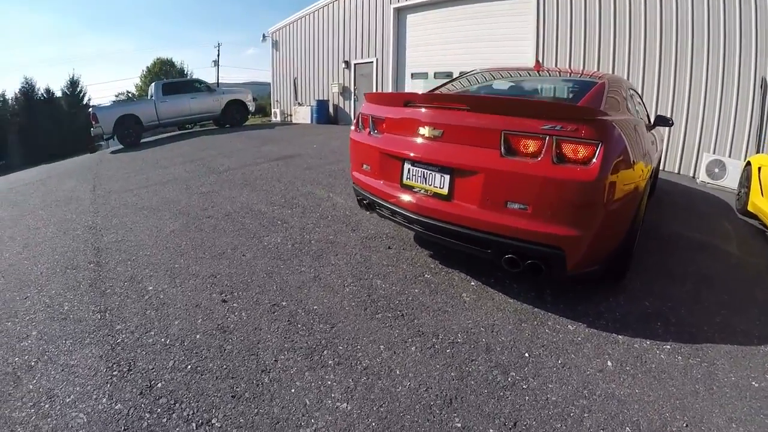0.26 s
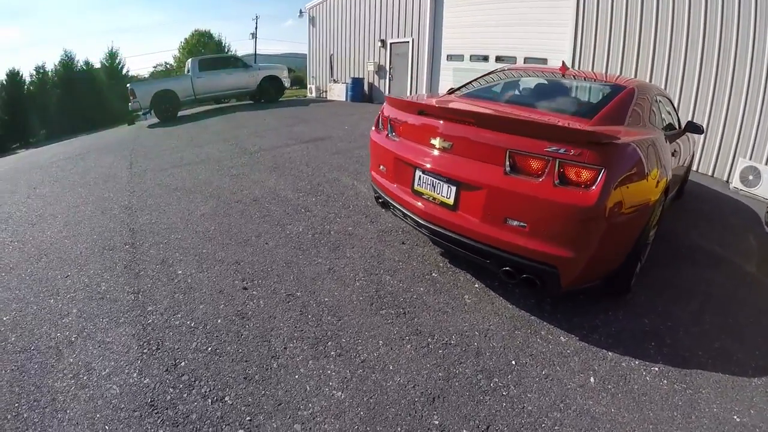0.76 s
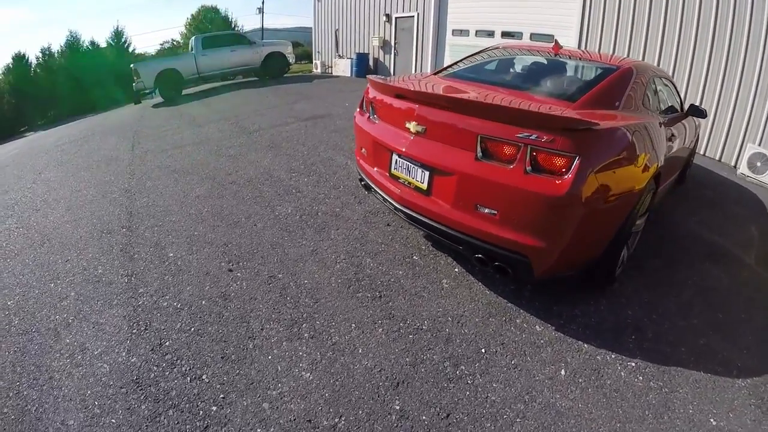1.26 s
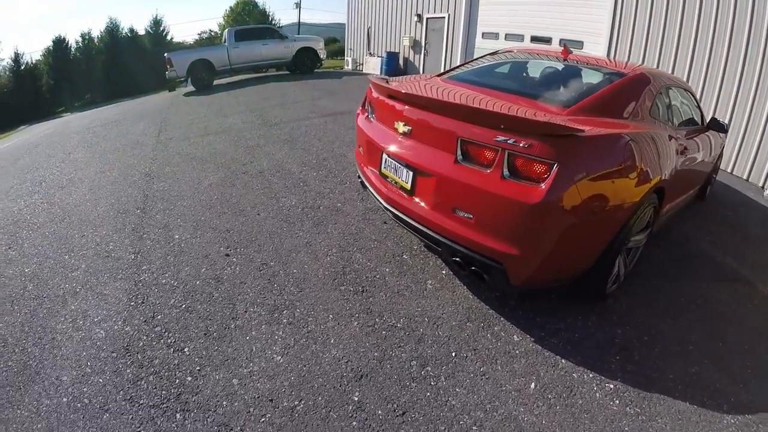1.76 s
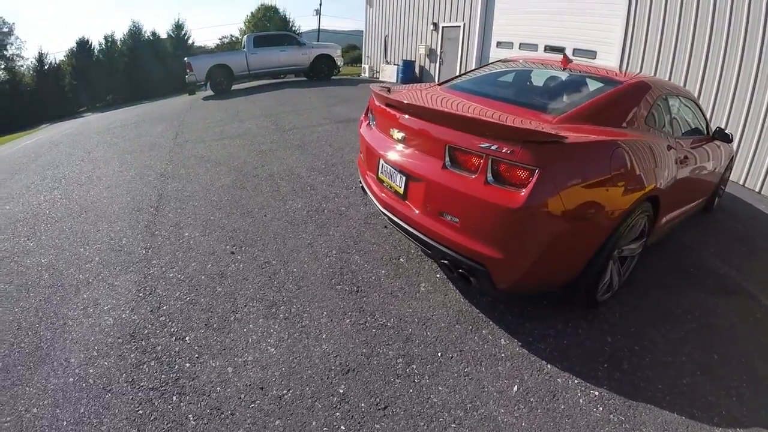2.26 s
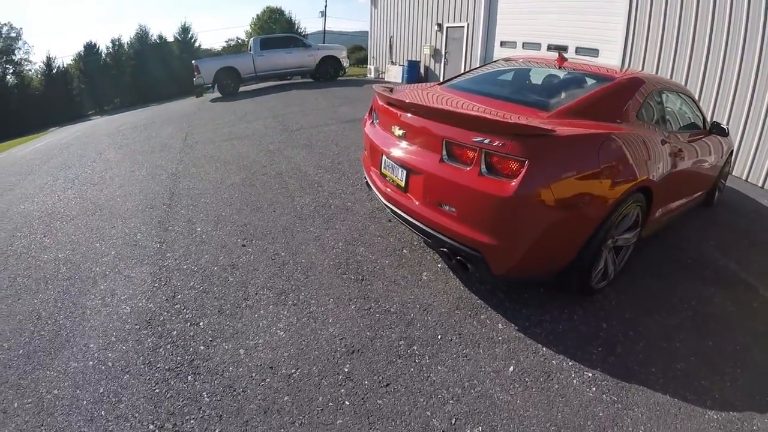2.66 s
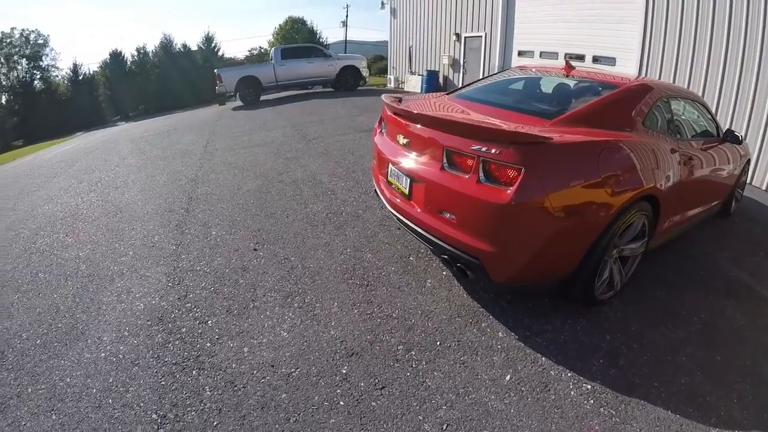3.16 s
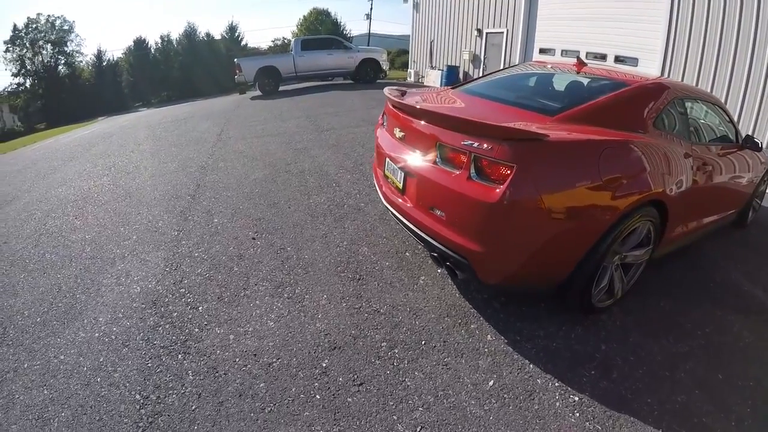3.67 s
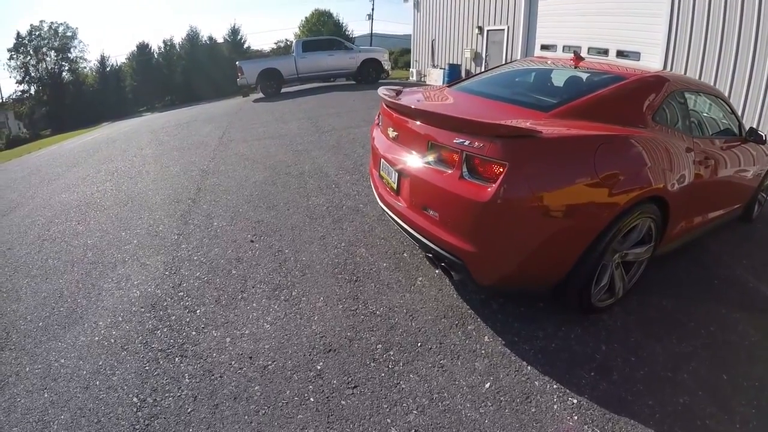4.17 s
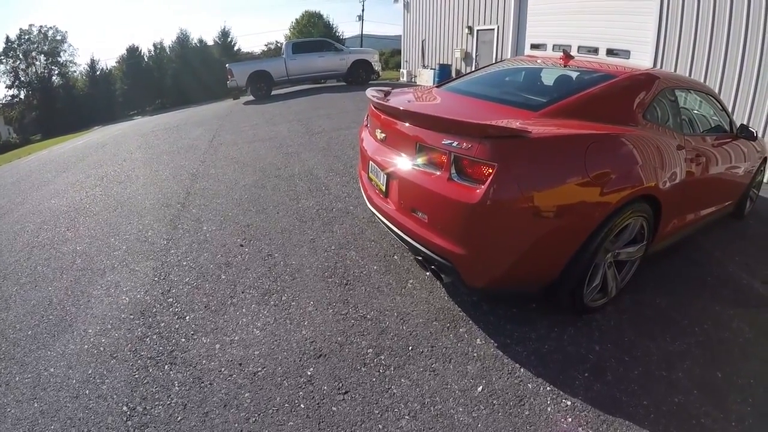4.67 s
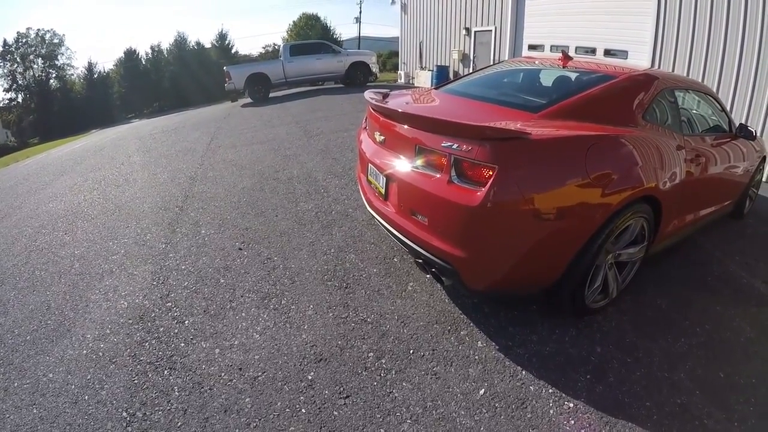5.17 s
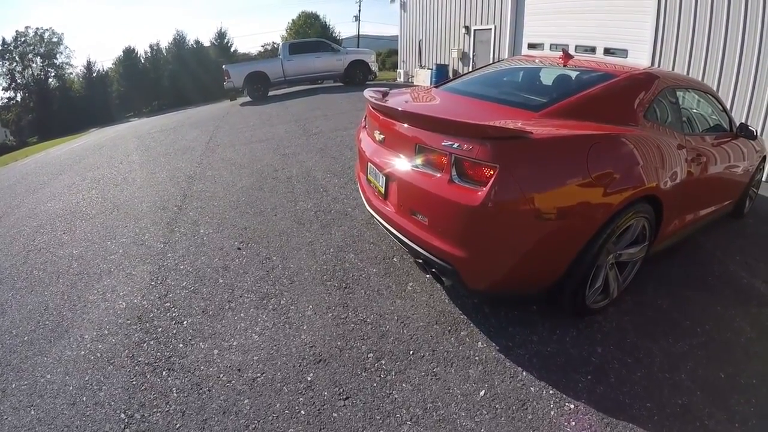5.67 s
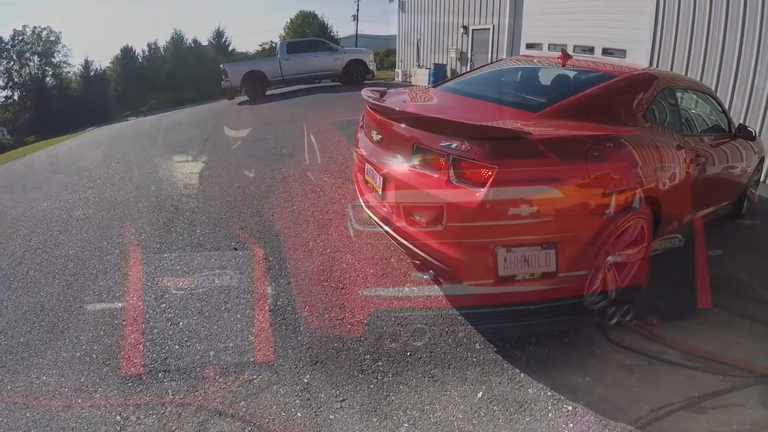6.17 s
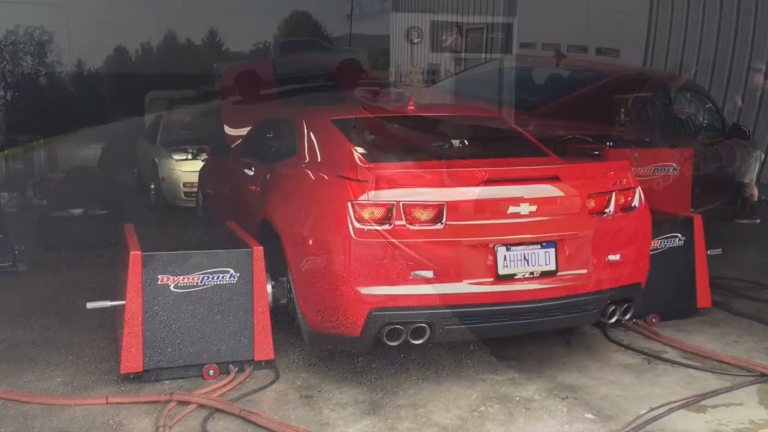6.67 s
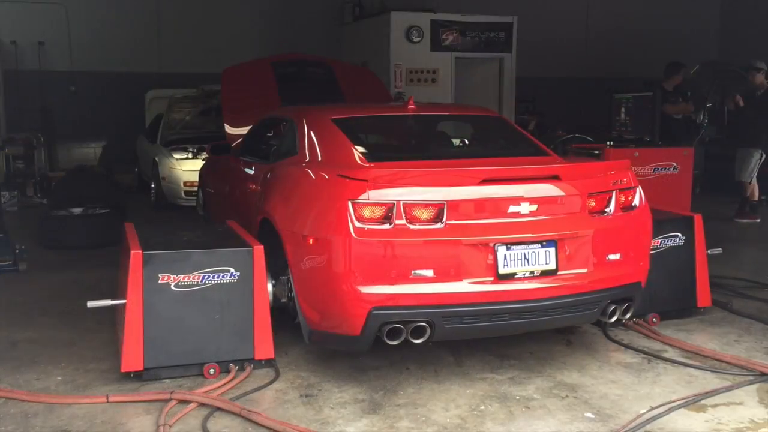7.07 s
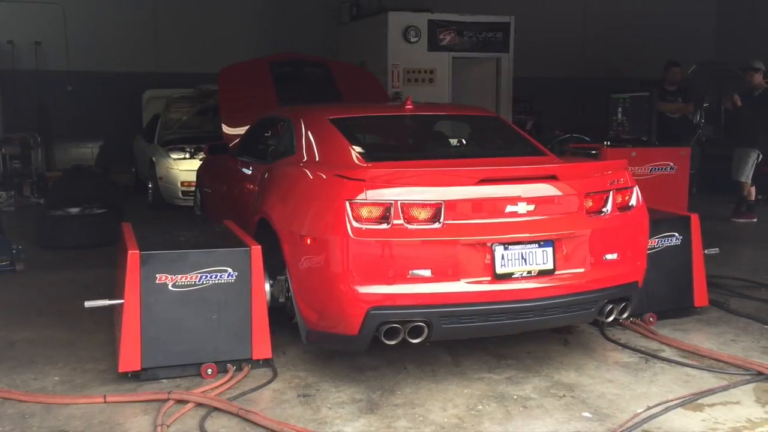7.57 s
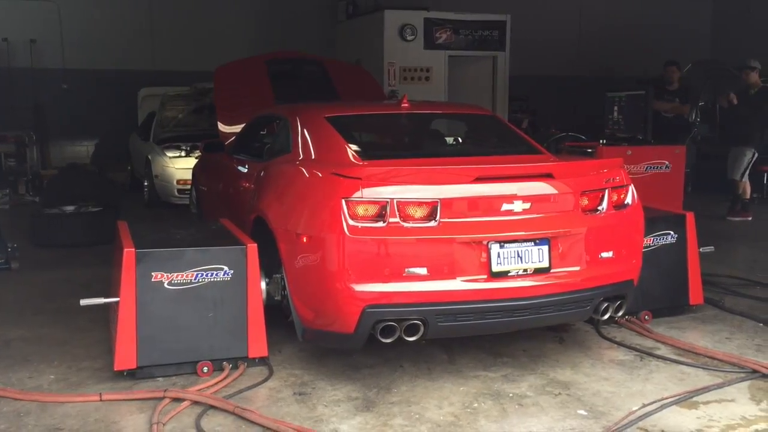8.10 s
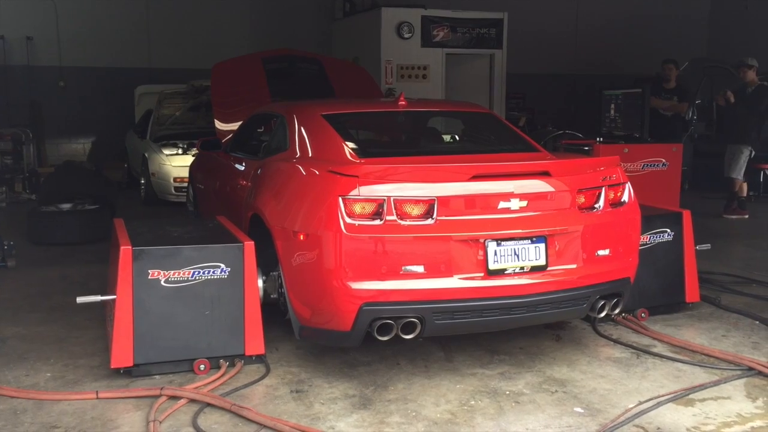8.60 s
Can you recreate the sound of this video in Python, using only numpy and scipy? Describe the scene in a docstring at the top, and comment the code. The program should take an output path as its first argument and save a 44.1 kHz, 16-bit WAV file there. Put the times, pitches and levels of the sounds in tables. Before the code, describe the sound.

Heard from close behind dual exhausts outdoors, a V8 falls quickly from a blip with hollow hoots, thumps and sharp pops, then catches and settles into a deep, uneven, booming idle with growing rasp and hiss. Around six seconds it dissolves into a full-throttle pull in a workshop, a resonant drone and gas roar rising in pitch and strength until the revs just begin to drop.

```python
"""A V8 with an open dual exhaust, heard from close behind: it drops from a blip with pops and hoots, then settles into a
booming, raspy idle. This fades into the same engine at full throttle on a dynamometer in a workshop, climbing in
speed until the revs begin to fall. Tones locked to the engine cycle make boom and drone; puffs of gas, as filtered
noise, make burble, bark, rasp, hiss and roar."""
import sys
import numpy as np
from scipy import signal
from scipy.fft import rfft, irfft, next_fast_len
from scipy.io import wavfile
from scipy.ndimage import uniform_filter1d, map_coordinates

SR = 44100
rng = np.random.default_rng(int(sys.argv[2]) if len(sys.argv) > 2 else 0)


def unload_wav(signal):
    """Save mono or channel-first audio to the path in sys.argv[1] as 16-bit WAV at rate SR, clipped to [-1, 1]."""
    wavfile.write(
        sys.argv[1],
        SR,
        np.round(np.clip(np.atleast_2d(signal).T, -1, 1) * 32767).astype(np.int16),
    )


N = 389844

# puff strength of each cylinder in firing order, before contrast: relative_db
CYLINDER_PUFFS = [-3.5, -0.5, -2, -3, 0, -2, -1.5, -0.57]
# ringing of the steel pipes: centre_hz, width_hz, relative_db
STEEL_MODES = [(1180, 146, -4.5), (1362, 50, 3.5), (1633, 122, 0), (1985, 70, -3.5), (2182, 90, -1),
               (2399, 94, 1.5), (2635, 124, -3), (3010, 167, 1.5), (3445, 135, 1), (3845, 150, -7),
               (4486, 200, -4)]
# colour of the jet's hiss: freq_hz, relative_db
HISS_COLOUR = [(3600, -41), (4800, 1), (5500, -1), (6100, -1), (7000, -4.5), (7450, -2.5), (7900, -6.5),
               (9500, -5), (11000, -10.5), (13000, -17), (15100, -24), (15600, -62)]
# a slow jet leaves the pipes' middle resonances weaker: freq_hz, relative_db
SLOW_JET_COLOUR = [(1650, 0.5), (1800, -5), (1950, 2), (2150, -6.5), (2420, -4.5), (2650, 2.5),
                   (3100, -2.5), (3550, 0.5), (4500, 1.5), (4950, 7), (5600, 1)]
# hollow ring of the tailpipes: freq_hz, relative_db
HOLLOW_COLOUR = [(50, -17), (115, 15), (160, 13.5), (220, -9), (255, -13), (276, 2.5), (300, -23),
                 (400, -10), (490, -2.5), (580, -19), (1000, -23), (1800, -27), (3000, -52), (8000, -68)]


def idle():
    """The pipe booms at the firing rate; each puff burbles, barks, rasps and hisses on its way out."""
    # gas jet strength against the settled idle: time_s, level_db
    jet_strength = [(0, -15.5), (.3, -22), (.95, -22), (1.25, -16.5), (1.55, -9.5), (2.1, -8.5), (2.6, -5),
                    (3.3, 0)]
    # idle speed beneath the blip, hunting a little: time_s, firings_per_s
    idle_speed = [(1.4, 47.54), (2, 50.92), (2.5, 49.39), (3.1, 50.16), (4.1, 51.35), (4.7, 51.61),
                  (5.2, 50.96), (5.5, 51.52), (6.2, 50.16)]
    blip_hz, run_down_s, first_firing = 69, 0.851, 1.17
    t = np.arange(N) / SR
    jet_db, = curves(jet_strength)
    # the fuel comes back and the engine catches
    caught = ramp(start_s=0.61, length_s=0.62)
    # the blip's surplus of firings dies away exponentially
    rate = curves(idle_speed)[0] + blip_hz * np.exp(-t / run_down_s)
    firings = first_firing + np.cumsum(rate) / SR
    cycles = firings / len(CYLINDER_PUFFS)
    outflow = firings - 0.17
    flow = puffs(outflow, rise_s=0.0037, decay_s=0.0049, contrast=0.46, steady=0.96)
    low = boom(rate, cycles, jet_db, caught) + lope(firings, rate, jet_db) + stumble(cycles) + thuds()
    puffing = burble(flow, cycles, jet_db) + bark(outflow, cycles)
    # the strongest puffs tear into a jet
    spit = spits()
    jetting = rasp(outflow, cycles, spit, jet_db) + hiss(outflow, spit, jet_db, caught)
    return low + thrum(flow) + puffing + jetting


def boom(rate, cycles, jet_db, caught):
    """Firing rate and overtones, loudest where the firing rate meets the pipe resonance."""
    # boom partials: multiple_of_cycle_rate, relative_db
    partials = [(8, 0.5), (16, -17.5), (32, -27)]
    # pipe resonance: firing_rate_hz, gain_db
    resonance = [(51, -0.5), (54, -0.5), (59, 0.8), (66, -0.5), (77, -1), (110, -15)]
    overrun_db, caught_db, overtone_db_per_jet_db = -25, -12.5, 0.99
    tone = np.zeros(N)
    for k, db in partials:
        growth_db = overtone_db_per_jet_db * jet_db * (k > len(CYLINDER_PUFFS))
        tone += amp(db + growth_db + 0.15 * wobble(13)) * np.cos(2 * np.pi * k * cycles)
    level_db = overrun_db + (caught_db - overrun_db) * caught
    return amp(level_db) * along(resonance, rate) * unit(tone)


def lope(firings, rate, jet_db):
    """Each bank fires unevenly, so the pipes' low resonances throb in turn, once every engine cycle."""
    # throbs: place_in_cycle_firings, length_firings, resonance_hz, level_db
    throbs = [(7.15, 3.1, 74, -17), (0.45, 1.6, 110, -37), (7.47, 1.27, 210, -29.5),
              (0.468, 1.43, 267, -29), (4.7, 2.03, 270, -32), (3.67, 2.5, 142, -30.5)]
    count = len(CYLINDER_PUFFS)
    total = np.zeros(N)
    for place, length, hz, db in throbs:
        offset = (firings - place + count / 2) % count - count / 2
        envelope = amp(db + 0.83 * wobble(6.6)) * swell(offset, length)
        total += envelope * np.cos(2 * np.pi * hz * offset / rate + 0.2 * wobble(12))
    return amp(jet_db) * total


def stumble(cycles):
    """Around the catch a lower order swells and beats against the boom."""
    order, middle_s, length_s, level_db = 6, 0.67, 0.72, -23.5
    t = np.arange(N) / SR
    return amp(level_db) * swell(t - middle_s, length_s) * np.cos(2 * np.pi * order * cycles)


def thuds():
    """Uneven low thudding: steady noise in a low band."""
    # thud colour: freq_hz, relative_db
    thud_colour = [(12, -19), (30, -11), (52, -2), (69, -2.5), (100, -12.5), (160, -36), (300, -77)]
    return amp(-32) * coloured(rng.standard_normal(N), thud_colour)


def burble(flow, cycles, jet_db):
    """Puffs modulate a ripple that largely repeats every engine cycle, coloured by the tailpipe."""
    # burble colour: freq_hz, relative_db
    burble_colour = [(60, -28.5), (95, 2.5), (122, 0), (150, -1), (175, 0), (203, 3), (228, -7.5),
                     (265, -3.5), (300, -10), (335, -13), (385, -16), (600, -54.5)]
    settled_db, db_per_jet_db = -30.5, 0.36
    ripple = gas(cycles + 0.001 * wobble(8), repeat=0.92)
    return amp(settled_db + db_per_jet_db * jet_db) * coloured(flow * ripple, burble_colour)


def bark(outflow, cycles):
    """Longer puffs excite the middle tailpipe resonances; the level opens up as the idle settles."""
    # bark colour: freq_hz, relative_db
    bark_colour = [(300, -40.5), (400, -13.5), (440, 0.5), (470, 4), (500, -4.5), (530, 5), (570, -9),
                   (612, 4), (650, -2.5), (700, 2), (750, -2), (810, -4), (900, -15), (1100, -17.5),
                   (1800, -47.5)]
    # bark level: time_s, level_db
    bark_level = [(0, -43), (.3, -47.5), (.95, -44), (1.25, -41.5), (1.55, -34.5), (2.52, -34.5),
                  (2.7, -29.5), (6.2, -28.5)]
    lumps = puffs(outflow, rise_s=0.002, decay_s=0.0096, contrast=0.55, steady=0.75)
    ripple = gas(cycles + 0.0012 * wobble(8), repeat=0.41)
    return amp(curves(bark_level)[0]) * coloured(lumps * ripple, bark_colour)


def spits():
    """Gain of the hard puffs that spit out of the idle."""
    # spits: time_s (4 ms before the middle), extra_db
    spit_times = [(2.134, 3), (2.728, 1), (3.312, 0), (3.651, 1.5), (3.929, 2.5), (3.967, 4), (4.24, 0.5),
                  (4.639, 1), (4.699, 0.5), (5.789, 0.5), (5.887, 0.5), (5.947, 2), (6.263, 2.5)]
    t = np.arange(N) / SR
    return amp(sum(db * swell(t - s - 0.004, 0.032) for s, db in spit_times))


def rasp(outflow, cycles, spit, jet_db):
    """The pulsing jet rings the steel; a slow jet leaves the middle modes weaker."""
    settled_db, db_per_jet_db = -32, 1
    jet = puffs(outflow, rise_s=0.0026, decay_s=0.0084, contrast=2.1, steady=0.33)
    jet *= amp(0.6 * wobble(18))
    ringing = steel(spit * jet * gas(cycles, repeat=0.3, size=8192), STEEL_MODES)
    full = churned(ringing, depth_db=4.5, size=512)
    slow = filtered(full, lambda hz: along(SLOW_JET_COLOUR, hz))
    fast = np.interp(jet_db, [-17, -9], [0, 1])
    return amp(settled_db + db_per_jet_db * jet_db) * (fast * full + (1 - fast) * slow)


def hiss(outflow, spit, jet_db, caught):
    """Jet turbulence at the tips: pulsed noise, duller in a slow jet and duller still on the overrun."""
    settled_db, db_per_jet_db = -36.5, 1.03
    # freq_hz, gain_db
    slow_colour = [(6000, -2.5), (8200, -0.5), (11000, -6.5), (15000, -3)]
    overrun_colour = [(5200, -2.5), (7000, -6.5)]
    spray = puffs(outflow, rise_s=0.003, decay_s=0.0062, contrast=3.2, steady=0.18)
    spray *= amp(0.31 * wobble(14))
    full = churned(coloured(spit * spray * rng.standard_normal(N), HISS_COLOUR), depth_db=6.5, size=512)
    slow = unit(filtered(full, lambda hz: along(slow_colour, hz)))
    speed = np.interp(jet_db, [-9, 0], [0, 1])
    mixed = speed * full + (1 - speed) * slow
    dull = filtered(mixed, lambda hz: along(overrun_colour, hz))
    return amp(settled_db + db_per_jet_db * jet_db) * (caught * mixed + (1 - caught) * dull)


def thrum(flow):
    """During the run-down the puffs keep the hollow tailpipes thrumming."""
    fade = 1 - ramp(start_s=1.382, length_s=0.55)
    return amp(-32.5) * fade * coloured(flow * rng.standard_normal(N), HOLLOW_COLOUR)


def pops():
    """Unburnt fuel goes off in the pipes: a pressure kick and its blast, a short crack, a ping of the steel."""
    # overrun pops: start_s, level_db, thump_relative_db, ring_hz
    pop_list = [(0.0777, -28, 9.5, 2945), (0.1066, -39, 7, 2945), (0.1275, -36, 4, 2920),
                (0.205, -34.5, 0, 4500), (0.33, -33.5, -11, 3450), (.41, -27.5, -11, 3490),
                (.44, -37, -8, 2783), (.742, -49, -3, 3300)]
    # blast colour: freq_hz, relative_db
    blast_colour = [(300, -23), (510, 2), (620, 4), (1000, -3), (1400, -15), (1950, -3), (2400, -37.5)]
    t = np.arange(SR // 5) / SR
    crack, blast, kicks, ping = np.zeros((4, N))
    for start_s, db, thump_db, ring_hz in pop_list:
        at = round(start_s * SR)
        # each decay: 60 dB in the given seconds
        ping_envelope = amp(db - 6.5 - 60 * t / 0.065) * (1 - np.exp(-t / 0.002))
        ping[at:][:len(t)] += ping_envelope * np.sin(2 * np.pi * ring_hz * t)
        crack[at:][:len(t)] += amp(db - 60 * t / 0.097) * (1 - np.exp(-t / 0.00041))
        blast[at:][:len(t)] += amp(db + thump_db - 60 * t / 0.068)
        kicks[at] = amp(db + thump_db)
    steel_noise, hiss_noise, blast_noise = rng.standard_normal((3, N))
    sharp = amp(-10) * coloured(steel(steel_noise, STEEL_MODES), SLOW_JET_COLOUR)
    sharp += amp(-17) * coloured(hiss_noise, HISS_COLOUR)
    thump = coloured(kicks, HOLLOW_COLOUR)
    thump *= kicks.max() / np.abs(thump).max()
    return crack * sharp + ping + amp(-11) * blast * coloured(blast_noise, blast_colour) + amp(2.5) * thump


def hoots():
    """Gas blows the tailpipes into short, wavering tones."""
    # hoots: middle_s, length_s, pitch_hz, level_db
    hoot_list = [(0.004, 0.056, 510, -28.5), (0.093, 0.28, 272.4, -34.5), (.1, 0.057, 490, -32.5),
                 (0.154, 0.28, 115.4, -26.5), (0.233, 0.18, 55, -23), (0.262, 0.063, 460, -30.5),
                 (1.288, 0.35, 273, -40)]
    t = np.arange(N) / SR
    total = np.zeros(N)
    for middle_s, length_s, pitch_hz, db in hoot_list:
        tone = np.sin(2 * np.pi * pitch_hz * t + 0.48 * wobble(34))
        total += amp(db) * swell(t - middle_s, length_s) * tone
    return total


def pull():
    """Under load the exhaust orders stand out over a roar of gas and ringing pipes."""
    # engine speed: time_s, four_stroke_cycles_per_s
    revs = [(6.5, 18.26), (7, 18.41), (7.3, 18.92), (7.6, 19.76), (8, 20.89), (8.2, 21.74), (8.35, 22.49),
            (8.6, 24.04), (8.66, 24.55), (8.72, 24.16), (8.84, 22.4)]
    rate, = curves(revs)
    # the gas flow builds up
    build = ramp(start_s=7.5, length_s=1.06)
    cycles = np.cumsum(rate) / SR + 0.001 * wobble(25)
    firings = cycles * len(CYLINDER_PUFFS)
    flow = puffs(firings, rise_s=0.00064, decay_s=0.0097, contrast=0.6, steady=0.62)
    tones = drone(rate, cycles, build) + blare(cycles, build)
    return tones + roar(flow, cycles, build) + buzz(firings, cycles, build) + rush(flow, build) + rumble()


def drone(rate, cycles, build):
    """Low exhaust orders sweep through the room's standing waves; total power is levelled."""
    # orders from the third multiple of cycle rate up: low_revs_relative_db, high_revs_relative_db
    loaded_orders = [(-46, -35), (-40, -53), (-44, -31), (-36.5, -39.5), (-50, -34), (-31.5, -35.5),
                     (-41, -37), (-36.5, -29.5), (-27.5, -34), (-49.5, -38), (-48, -27.5), (-41.5, -33),
                     (-34, -41), (-27.5, -23.5), (-49, -40), (-36, -42), (-34.5, -39), (-44, -31),
                     (-52, -45), (-51, -39), (-51, -41), (-42, -36), (-44, -42), (-46, -47), (-44.5, -33),
                     (-41.5, -38)]
    # workshop standing waves: freq_hz, gain_db
    shop_modes = [(55, -5), (90, 5.5), (120, 0.5), (136, 5.5), (155, 14), (172, 8.5), (195, -4.5), (240, 5),
                  (265, 3), (320, -7.5), (345, 0), (375, -1.5), (430, -8), (560, 0), (780, -15)]
    start_db, gain_db = -20, 0.35
    # swell as the firing rate crosses the main standing wave
    swell_cycles_per_s, swell_width_cycles_per_s, swell_db = 19.14, 0.63, 2.5
    climb = (rate - rate.min()) / np.ptp(rate)
    total, power = np.zeros(N), np.zeros(N)
    for k, (low_db, high_db) in enumerate(loaded_orders, 3):
        gain = amp(low_db + climb * (high_db - low_db)) * along(shop_modes, k * rate)
        total += gain * amp(1.53 * wobble(20)) * order_tone(k, cycles)
        power += gain ** 2 / 2
    crossing = np.exp(-((rate - swell_cycles_per_s) / swell_width_cycles_per_s) ** 2)
    level_db = start_db + gain_db * build + swell_db * crossing
    return amp(level_db) * total / np.sqrt(power)


def blare(cycles, build):
    """The upper orders, each fluttering, swelling and sinking at random."""
    # blare colour: freq_hz, relative_db
    blare_colour = [(520, 0), (640, -1), (730, -3), (820, 1), (920, 2.5), (1020, -2.5), (1120, -14),
                    (1350, -16)]
    start_db, gain_db = -44, 10.5
    orders = sum(amp(3.5 * wobble(6) + 3 * wobble(45)) * order_tone(k, cycles) for k in range(29, 57))
    return amp(start_db + gain_db * build) * coloured(orders, blare_colour)


def order_tone(k, cycles):
    """A tone at k times the cycle rate, in random phase."""
    return np.cos(2 * np.pi * (k * cycles + rng.random()))


def roar(flow, cycles, build):
    """Puffs modulate a half-repeating gas ripple, coloured by the exhaust and churned."""
    # roar colour: freq_hz, relative_db
    roar_colour = [(45, -29), (90, 0.5), (300, -1), (450, -3), (550, 0.5), (750, -5), (950, -7),
                   (1130, -12.5), (1350, -11), (1540, -5.5), (1800, -9), (2050, -11.5), (2450, -15),
                   (2700, -11), (3000, -16), (3300, -13), (3900, -13.5), (4200, -12), (4700, -22.5),
                   (7000, -58)]
    start_db, gain_db = -36, 6.5
    ripple = gas(cycles + 0.0015 * wobble(22), repeat=0.55)
    return amp(start_db + gain_db * build) * churned(coloured(flow * ripple, roar_colour), depth_db=3, size=256)


def buzz(firings, cycles, build):
    """The steep front of each puff makes the hot steel buzz."""
    # hot pipe modes: centre_hz, width_hz, relative_db
    hot_modes = [(1523, 70, -0.5), (1724, 64, -1.5), (2580, 75, -1.5), (2694, 61, -8), (3576, 54, -8),
                 (4183, 95, -2), (5350, 40, -11)]
    start_db, gain_db = -44, 8
    fronts = puffs(firings, rise_s=0.0003, decay_s=0.0016, contrast=1.6, steady=0.08)
    ringing = steel(fronts * gas(cycles, repeat=0.45), hot_modes)
    return amp(start_db + gain_db * build) * churned(ringing, depth_db=4, size=1024)


def rush(flow, build):
    """High gas noise pulsed by the puffs."""
    # rush colour: freq_hz, relative_db
    rush_colour = [(3800, -37), (5100, -1), (5700, -2), (7300, -5), (7700, -8.5), (8600, -7), (9700, -8.5),
                   (10500, -13.5), (13000, -12.5), (15700, -19)]
    start_db, gain_db = -50.5, 6.5
    return amp(start_db + gain_db * build) * coloured(flow * rng.standard_normal(N), rush_colour)


def rumble():
    """Steady low noise beneath the pull."""
    return amp(-52) * coloured(rng.standard_normal(N), [(10, -10), (45, -11), (90, -1), (250, -38)])


def puffs(firings, rise_s, decay_s, contrast, steady):
    """Gas flow at rms 1: one puff a firing, of its cylinder's strength with random scatter, on a steady flow."""
    at = np.flatnonzero(np.diff(np.floor(firings)))
    cylinder = np.floor(firings[at + 1]).astype(int) % len(CYLINDER_PUFFS)
    scatter_db = rng.uniform(-1.6, 1.6, len(at))
    kicks = np.zeros(N)
    kicks[at] = amp(contrast * np.array(CYLINDER_PUFFS)[cylinder] + scatter_db)
    t = np.arange(SR // 10) / SR
    shape = (1 - np.exp(-(t / rise_s) ** 2)) * np.exp(-t / decay_s)
    return unit(signal.oaconvolve(kicks, shape / shape.max())[:N] + steady)


def gas(cycles, repeat, size=2048):
    """White pressure ripple; the power share `repeat` comes back every engine cycle and splits into orders."""
    pattern = rng.standard_normal(size)
    locked = np.interp(cycles * size, np.arange(size), pattern, period=size)
    locked *= np.sqrt(size * np.gradient(cycles))
    share = np.clip(repeat, 0, 1)
    return np.sqrt(share) * locked + np.sqrt(1 - share) * rng.standard_normal(N)


def steel(x, modes):
    """x rings the pipes: parallel resonances of alternating sign."""
    def ring(f):
        total = 0
        for k, (centre, width, db) in enumerate(modes):
            damping = 1j * f * width
            total = total + (-1) ** k * amp(db) * damping / (centre * centre - f * f + damping)
        return total
    return filtered(x, ring)


def churned(x, depth_db, size):
    """Turbulence feeds each resonance unevenly: patches of random gain in time and pitch, at rms 1."""
    z = signal.stft(x, nperseg=size)[2]
    field = uniform_filter1d(rng.standard_normal(z.shape), size=3, axis=0)
    field = uniform_filter1d(field, size=3, axis=1)
    gain = amp(depth_db * np.tanh(unit(field)))
    return unit(signal.istft(z * gain, nperseg=size)[1][:N])


def coloured(x, points, size=8192):
    """x through a causal minimum-phase filter of the given colour, at rms 1."""
    cepstrum = irfft(np.log(along(points, np.fft.rfftfreq(size, 1 / SR))))
    cepstrum[1:size // 2] *= 2
    cepstrum[size // 2 + 1:] = 0
    return unit(signal.oaconvolve(x, irfft(np.exp(rfft(cepstrum))))[:N])


def filtered(x, response):
    """x times a response of frequency."""
    m = next_fast_len(N + SR // 2, True)
    return irfft(rfft(x, m) * response(np.fft.rfftfreq(m, 1 / SR)), m)[:N]


def along(points, hz):
    """Gain of (Hz, dB) points on a log axis."""
    f, db = np.transpose(points)
    return amp(np.interp(np.log(hz + 1), np.log(f + 1), db))


def curves(rows):
    """One value per sample for each column after the time."""
    s, *cols = np.transpose(rows)
    return [np.interp(np.arange(N) / SR, s, c) for c in cols]


def wobble(rate):
    """A smooth random curve, rate knots a second."""
    steps = np.arange(0, N + 64, 64)
    slow = map_coordinates(rng.standard_normal(int(N * rate / SR) + 4), [steps * rate / SR])
    return np.interp(np.arange(N), steps, slow)


def ramp(start_s, length_s):
    """A straight rise from 0 to 1."""
    return np.clip((np.arange(N) / SR - start_s) / length_s, 0, 1)


def swell(offset, length):
    """A rounded hump of height 1 around offset 0."""
    return np.cos(np.pi * np.clip(offset / length, -0.5, 0.5))


def amp(db):
    """Decibels to gain."""
    return 10 ** (np.asarray(db) / 20)


def unit(x):
    """x at rms 1."""
    return x / np.sqrt(np.mean(x ** 2) + 1e-20)


def scene():
    """The idle outdoors dissolves into the pull indoors."""
    # time_s, gain
    leaving, = curves([(6.12, 1), (6.4, 0.62), (6.65, 0.25), (6.9, 0)])
    arriving, = curves([(6.1, 0.056), (6.35, 0.25), (6.6, 0.65), (6.85, 0.86)])
    return (leaving * (idle() + pops() + hoots()) + arriving * pull())[None]


def record(dry):
    """A sharp band limit cuts everything from 15750 Hz up."""
    return filtered(dry[0], lambda hz: hz < 15750)[None]


dry = scene()
out = record(dry)
unload_wav(out)
```